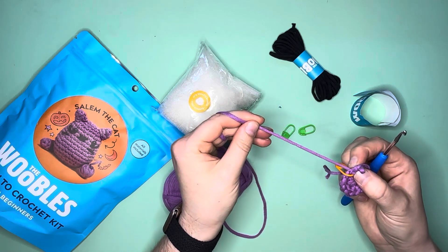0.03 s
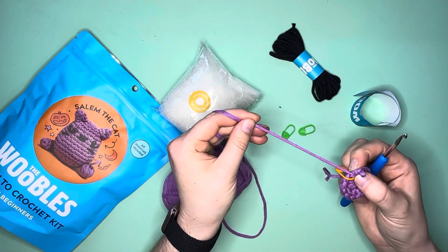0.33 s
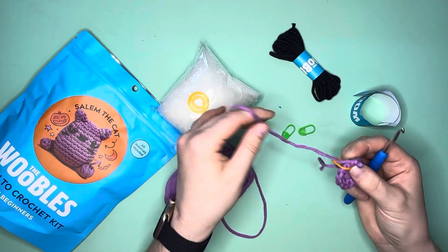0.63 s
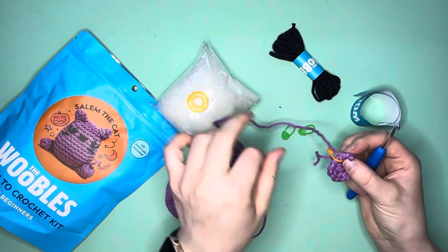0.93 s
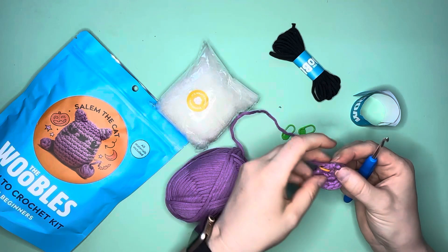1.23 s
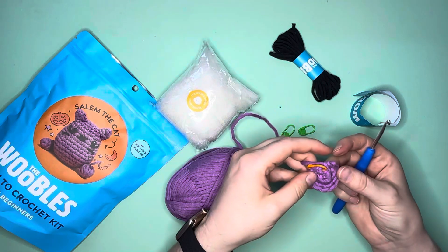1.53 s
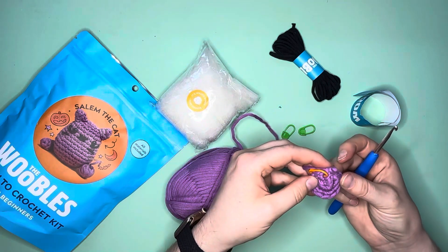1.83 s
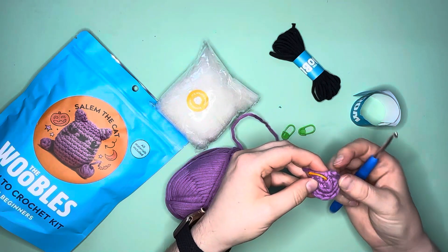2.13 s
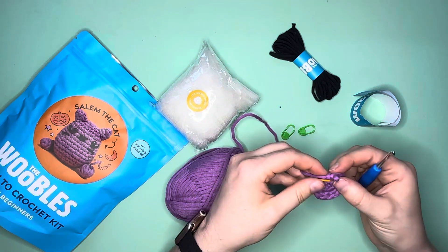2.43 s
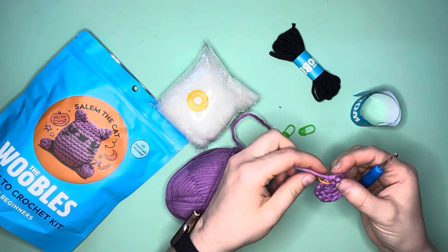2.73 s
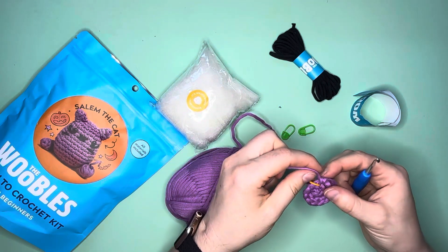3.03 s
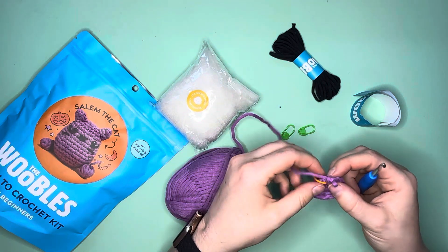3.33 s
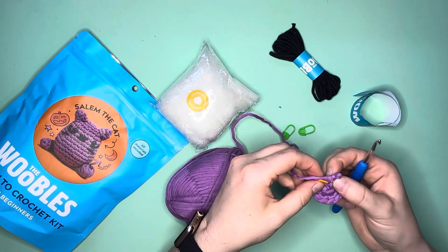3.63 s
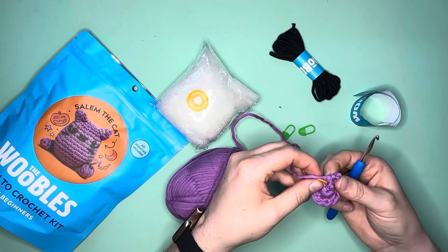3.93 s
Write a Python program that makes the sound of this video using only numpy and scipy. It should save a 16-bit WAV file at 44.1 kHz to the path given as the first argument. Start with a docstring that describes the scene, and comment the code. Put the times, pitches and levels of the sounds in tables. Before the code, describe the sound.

Faint rustles and ticks of handled yarn against room hum, as a distant car approaches.

```python
"""Crochet in a quiet room

Hands draw yarn through a small crochet piece, close to two microphones above a table.
Fibres snag in faint rustles and ticks, the sliding strand sings a hollow friction note,
and fingers brush the ball, rub and bump the hook. Under it lie mains hum and room hiss,
while a low rumble, probably a car outside, slowly comes nearer."""
import sys
import numpy as np
from scipy import signal
from scipy.fft import rfft, irfft
from scipy.io import wavfile

SR = 44100
rng = np.random.default_rng(int(sys.argv[2]) if len(sys.argv) > 2 else 0)


def to_wav(s):
    """Save 16-bit WAV."""
    ch = np.atleast_2d(s).T  # columns
    pcm = np.round(np.clip(ch, -1, 1) * 32767)  # PCM
    wavfile.write(sys.argv[1], SR, pcm.astype(np.int16))


N = 176400
T, HZ = np.arange(N) / SR, np.fft.rfftfreq(N, 1 / SR)

# diffuse sound at the microphones: (frequency [Hz], left-right correlation [-], clipped to +-1 in use)
DIFFUSE_CORRELATION = [(100, 1), (250, 0.82), (400, 0.79), (600, 0.38), (850, -0.36), (1300, -0.069),
                       (3000, 0.26), (16000, -1.4)]
# bright fibre rustle, with an audio coder's treble cut above about 14 kHz:
# (frequency [Hz], density [dB/Hz])
RUSTLE_SPECTRUM = [(300, -145), (1500, -135), (4000, -123), (6500, -119), (8500, -114), (11000, -116),
                   (13000, -115), (13900, -116), (14700, -128), (16500, -135)]


def amp(db):
    """Decibels to gain."""
    return 10 ** (np.asarray(db) / 20)


def unit_rms(x):
    """Scales to rms 1."""
    return x / np.sqrt(np.mean(x ** 2) + 1e-20)


def curve(points):
    """Joins (Hz, value) points on a log-frequency axis."""
    hz, value = np.transpose(points)
    return np.interp(np.log(HZ + 1), np.log(hz + 1), value)


def colour(white, spectrum):
    """Gives unit white noise a spectrum in dB/Hz."""
    return irfft(rfft(white) * amp(curve(spectrum)), N) * np.sqrt(SR / 2)


def band(white, hz, width_hz):
    """Gaussian band of noise, rms 1."""
    return unit_rms(irfft(rfft(white) * np.exp(-2 * ((HZ - hz) / width_hz) ** 2), N))


def noise_pair(correlation):
    """White noise at two microphones, partly alike."""
    left, other = rfft(rng.standard_normal((2, N)))
    c = np.clip(correlation, -1, 1)
    return irfft(np.array([left, c * left + np.sqrt(1 - c ** 2) * other]), N)


def diffuse(spectrum):
    """Coloured noise arriving from all sides."""
    return colour(noise_pair(curve(DIFFUSE_CORRELATION)), spectrum)


def pan(right_db):
    """Gains that put the right channel right_db above the left."""
    return amp(np.array([[-.5], [.5]]) * right_db)


def from_left(left, right, lead_ms=.255):
    """Sound reaches the left microphone first."""
    return np.array([left, irfft(rfft(right) * np.exp(-2j * np.pi * HZ * lead_ms / 1000), N)])


def waver(rate_hz, depth_db):
    """Randomly drifting gain."""
    drift = irfft(rfft(rng.standard_normal(N)) * np.exp(-(HZ / rate_hz) ** 2) * (HZ > 0), N)
    return amp(depth_db * unit_rms(drift))


def swell(peak_s, rise_s, fall_s):
    """Gaussian rise and fall; times to 1/e."""
    return np.exp(-((T - peak_s) / np.where(T < peak_s, rise_s, fall_s)) ** 2)


def hum(hz=120, left_db=-44.6, right_db=-42.15, left_lag_ms=.05):
    """Steady tone at twice the mains frequency."""
    lag_s = np.array([[left_lag_ms / 1000], [0]])
    cycles = hz * (T - lag_s) + rng.random()
    return np.sqrt(2) * amp([[left_db], [right_db]]) * np.sin(2 * np.pi * cycles)


def room():
    """Low rumble and a slightly wavering hiss, brighter on the right."""
    # room rumble: (frequency [Hz], density [dB/Hz])
    rumble_spectrum = [(20, -99), (40, -94), (65, -79.5), (78, -89.5), (97, -73.5), (125, -84),
                       (160, -84.5), (210, -90.5), (300, -106), (500, -130), (2000, -170)]
    # air hiss, left: (frequency [Hz], density [dB/Hz])
    left_spectrum = [(100, -105), (290, -100), (370, -96), (500, -105), (660, -112), (1050, -104),
                     (1550, -106), (1850, -114), (3000, -122), (6000, -127), (10000, -132), (13000, -138),
                     (16000, -145)]
    # air hiss, right: (frequency [Hz], density [dB/Hz])
    right_spectrum = [(100, -102), (290, -96), (400, -92), (560, -99), (720, -109), (1050, -99),
                      (1280, -103), (1550, -99), (1800, -103), (2200, -102), (2700, -106), (3800, -109),
                      (4500, -107), (5150, -114), (5900, -105.5), (6350, -108.5), (7000, -117),
                      (9000, -129), (13000, -138), (16000, -145)]
    left, right = from_left(*noise_pair(correlation=.31), lead_ms=.41) * waver(rate_hz=12, depth_db=.55)
    hiss = np.array([colour(left, left_spectrum), colour(right, right_spectrum)])
    return hiss + diffuse(rumble_spectrum) * pan(right_db=-2.5)


def car():
    """Road roar, tyre noise and tread note, dulled by walls, grow as the car nears and ring the room."""
    # approach: (time [s], roar gain [dB], tyre gain [dB], tread level [dB])
    approach = [(0, -30.5, -19, -91), (1.202, -15.5, -16, -81), (1.601, -13, -20, -82.5),
                (1.85, -12.5, -14, -80), (2.25, -7.5, -8, -73.5), (2.7, -6, -8.5, -85.5),
                (3.1, -4.5, -5.5, -77), (3.35, -3, -4, -71), (3.65, -2.5, -2.5, -66),
                (3.75, -4, -2.5, -65.5), (4, 0.5, 1.5, -69.5)]
    # road roar: (frequency [Hz], density [dB/Hz])
    roar_spectrum = [(25, -105), (55, -82.5), (100, -68.5), (150, -80), (240, -81), (320, -88),
                     (450, -84.5), (620, -92), (850, -90.5), (1200, -101), (2200, -120), (6000, -160)]
    # tyre noise: (frequency [Hz], density [dB/Hz])
    tyre_spectrum = [(200, -125), (500, -110), (900, -101), (1040, -92.5), (1300, -89), (1520, -93),
                     (1850, -104), (2500, -117), (4000, -126), (8000, -145), (16000, -165)]
    # room resonances: (frequency [Hz], width [Hz], lift [dB])
    room_modes = [(348.4, 14, 10), (411, 22, 4), (526, 19, 6), (574, 25, 11), (640, 30, 3.5),
                  (720, 8.7, -2), (1023, 33, 7), (1102, 24, 3.5), (1259, 27, 6), (1484, 24, 6.5)]
    times_s, *levels_db = np.transpose(approach)
    roar_gain, tyre_gain, tread_gain = (amp(np.interp(T, times_s, db)) for db in levels_db)
    roar = diffuse(roar_spectrum) * roar_gain * waver(rate_hz=19, depth_db=1.13)
    tyres = colour(noise_pair(correlation=.43), tyre_spectrum) * tyre_gain
    tread = band(noise_pair(correlation=.88), hz=1097, width_hz=200) * tread_gain
    outside = (roar + tyres + tread) * pan(right_db=5)
    lift_db = sum(db / (1 + (2 * (HZ - hz) / width_hz) ** 2) for hz, width_hz, db in room_modes)
    return irfft(rfft(outside) * amp(lift_db), N)


def yarn(snags_per_s=4500, snag_spread_db=1.5, fidget_db=-27):
    """Strokes drag fibres over each other: a stream of tiny snags, fuller under pressure."""
    # yarn strokes: (peak time [s], rise [s], fall [s], level [dB], body relative to level [dB])
    strokes = [(.409, 0.013, 0.018, -7, -2), (.578, .015, .02, -9, -1), (.632, 0.025, 0.045, -5.5, 8),
               (.682, 0.061, 0.035, 1, 4), (.745, 0.033, 0.054, -3.5, 4), (.777, 0.0098, 0.011, -3.5, 7),
               (.85, 0.074, 0.041, -13.5, -9), (1.035, 0.05, 0.055, -16, -10.5),
               (1.155, 0.047, 0.035, -10, -18), (1.258, 0.045, 0.047, -3, -12),
               (1.315, .015, 0.027, -11, -12), (1.42, 0.054, 0.055, -5.5, -21.5),
               (2.255, 0.052, 0.041, -1.5, -6), (2.43, .07, 0.04, -13.5, -12),
               (2.63, 0.077, 0.13, -18, -13), (3.155, 0.034, 0.027, -15, -12.5),
               (3.36, 0.025, .025, -17.5, -15.5), (3.63, 0.013, 0.014, -17, 4)]
    # body added by pressure: (frequency [Hz], density [dB/Hz])
    body_spectrum = [(150, -115), (400, -101), (900, -101), (1700, -104), (2600, -113), (4500, -113),
                     (6200, -109), (8000, -118), (12000, -135), (16000, -150)]
    slip_power = amp(fidget_db) ** 2  # the yarn never lies quite still
    press_power = 0
    for peak_s, rise_s, fall_s, db, body_db in strokes:
        stroke = amp(db) * swell(peak_s, rise_s, fall_s)
        slip_power += stroke ** 2
        press_power += (stroke * amp(body_db)) ** 2
    snags = (rng.random(N) < snags_per_s / SR) * rng.choice([-1, 1], N)
    snags = snags * amp(snag_spread_db * np.minimum(rng.exponential(1, N), 4))
    clumps = waver(rate_hz=60, depth_db=2)
    rustle = colour(unit_rms(snags), RUSTLE_SPECTRUM) * np.sqrt(slip_power) * clumps
    body = diffuse(body_spectrum) * np.sqrt(press_power)
    return from_left(rustle, rustle) + body * pan(right_db=5.5)


def resonate(x, hz, width_hz):
    """Unity-gain resonance that follows the curve hz."""
    carrier = np.exp(2j * np.pi * np.cumsum(hz) / SR)
    pole = np.exp(-np.pi * width_hz / SR)
    return 2 * (carrier * signal.lfilter([1 - pole], [1, -pole], x / carrier)).real


def strand(width_hz=270):
    """Friction sings in one narrow band, rising as the strand speeds up and falling as it slows."""
    # slides under the fingers: (peak time [s], rise [s], fall [s], level [dB], pitch [Hz], glide [Hz/s])
    slides = [(.475, 0.08, 0.11, -67, 1394, 1299), (.66, 0.16, 0.11, -73, 1550, -1.5),
              (.95, 0.18, 0.061, -71.5, 1545, -1), (1.09, 0.067, 0.11, -71, 1435, -1100),
              (2.5, 0.067, .08, -72.5, 1540, -7.5), (2.95, 0.061, 0.11, -71, 1386, -400)]
    powers = np.array([(amp(db) * swell(*timing)) ** 2 for *timing, db, _, _ in slides]) + 1e-20
    pitches_hz = np.array([hz + glide * (T - peak_s) for peak_s, *_, hz, glide in slides])
    centre_hz = np.average(pitches_hz, axis=0, weights=powers)
    friction = noise_pair(correlation=.5)
    note = resonate(resonate(friction, centre_hz, width_hz), centre_hz, width_hz)
    return unit_rms(note) * np.sqrt(powers.sum(0)) * pan(right_db=10.5)


def fibre_snaps(decay_s=.0026):
    """Caught fibres let go with short bright ticks."""
    # single fibres snapping free: (time [s], level [dB])
    snaps = [(.409, 7), (.613, -3), (.624, 0), (.779, 2), (1.129, 0), (1.279, -8)]
    bursts = sum(amp(db) * (T >= at_s) * np.exp(-abs(T - at_s) / decay_s) for at_s, db in snaps)
    ticks = colour(rng.standard_normal(N) * bursts, RUSTLE_SPECTRUM)
    return from_left(ticks, ticks)


def hand_brush():
    """Skin sweeps once over the ball of yarn."""
    # skin on yarn: (frequency [Hz], density [dB/Hz])
    brush_spectrum = [(30, -100), (70, -79.5), (160, -100.5), (300, -98.5), (550, -94.5), (900, -100),
                      (1600, -100), (2000, -113), (4000, -128), (9000, -150)]
    envelope = swell(peak_s=.91, rise_s=.2, fall_s=.2) * waver(rate_hz=31, depth_db=1)
    return diffuse(brush_spectrum) * envelope * pan(right_db=7)


def drone(level_db=-68):
    """A faint narrow note in the rumble swells and fades."""
    note = band(noise_pair(curve(DIFFUSE_CORRELATION)), hz=403, width_hz=18)
    return note * amp(level_db) * swell(peak_s=2.5, rise_s=.6, fall_s=.68) * pan(right_db=5)


def finger_rubs():
    """Fingers rub dully on hook and stitches."""
    # rubs: (peak time [s], rise [s], fall [s], level [dB])
    rubs = [(3.699, 0.0078, 0.0072, 0.5), (3.743, 0.036, 0.033, -3), (3.826, 0.07, 0.029, -3.5),
            (3.915, 0.097, 0.029, -5.5), (3.987, 0.013, 0.036, -4)]
    # rubbing noise: (frequency [Hz], density [dB/Hz])
    rub_spectrum = [(60, -110), (150, -80), (250, -75), (420, -96.5), (620, -75.5), (900, -89.5),
                    (1500, -95.5), (3000, -122), (7000, -160)]
    effort = np.sqrt(sum((amp(db) * swell(*timing)) ** 2 for *timing, db in rubs))
    return diffuse(rub_spectrum) * effort * waver(rate_hz=20, depth_db=1) * pan(right_db=4)


def hook_knocks(rise_s=.0011):
    """The hook bumps the fingers; the hand damps its ring at once."""
    # bumps: (time [s], level [dB])
    knocks = [(3.689, -47.5), (3.825, -55), (3.992, -60)]
    # dull ring of the hook: (frequency [Hz], level [dB], t60 [s])
    hook_modes = [(250, -10, 0.02), (520, 3, 0.04), (650, -1.5, 0.024), (1040, -5, 0.0307)]
    t = np.arange(SR // 8) / SR
    ring = sum(amp(db - 60 * t / t60_s) * np.sin(2 * np.pi * hz * t) for hz, db, t60_s in hook_modes)
    ring *= 1 - np.exp(-t / rise_s)
    bumps = sum(amp(db) * np.interp(T - at_s, t, ring, left=0, right=0) for at_s, db in knocks)
    return bumps * pan(right_db=6)


def scene():
    """All sources at the two microphones."""
    background = hum() + room() + car() + drone()
    return background + yarn() + strand() + fibre_snaps() + hand_brush() + finger_rubs() + hook_knocks()


def record(dry):
    """Band limit at 16 kHz."""
    taps = signal.firwin(511, 16000, window=("kaiser", 9), fs=SR)
    return signal.oaconvolve(dry, taps[None], "same")


dry = scene()
out = record(dry)
to_wav(out)
```